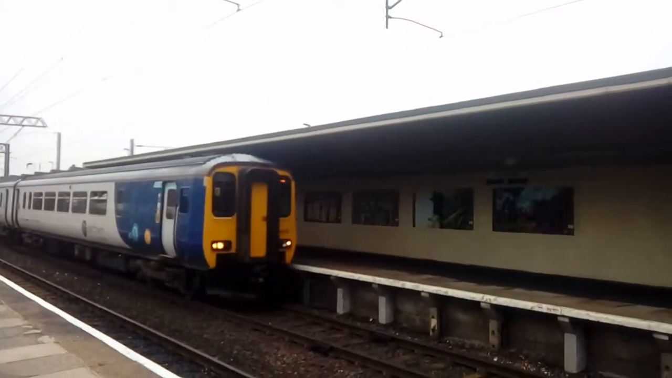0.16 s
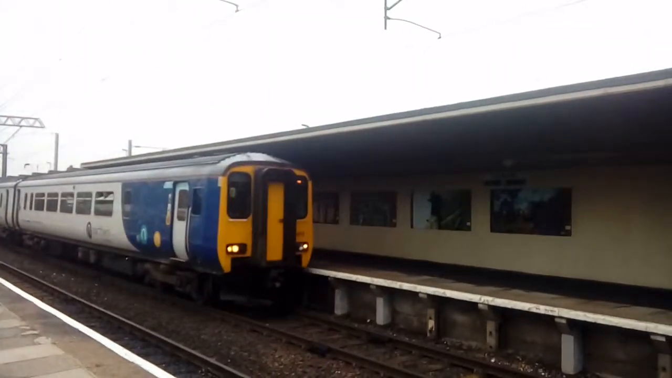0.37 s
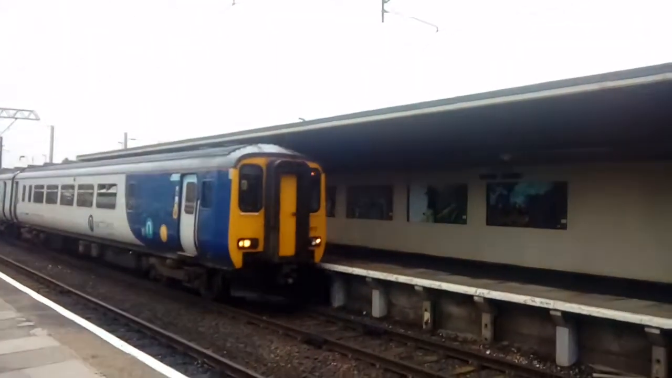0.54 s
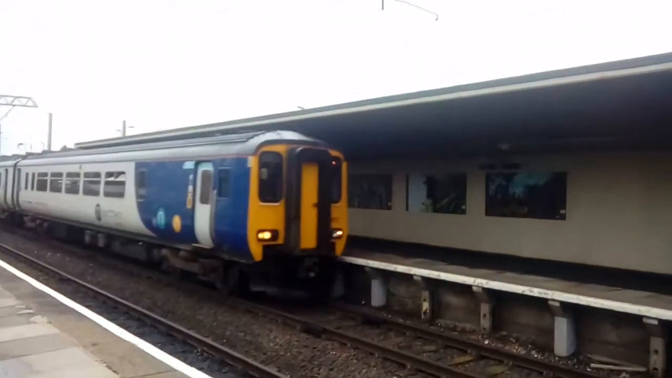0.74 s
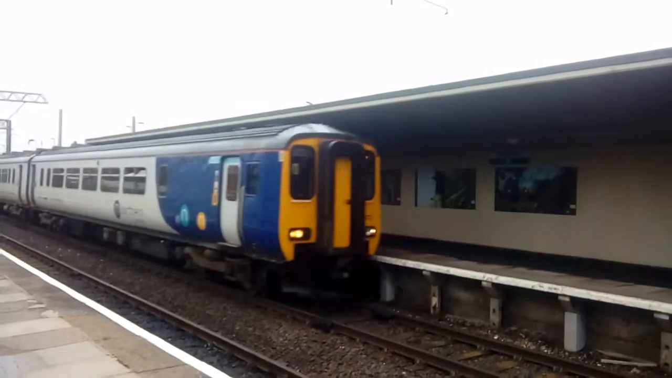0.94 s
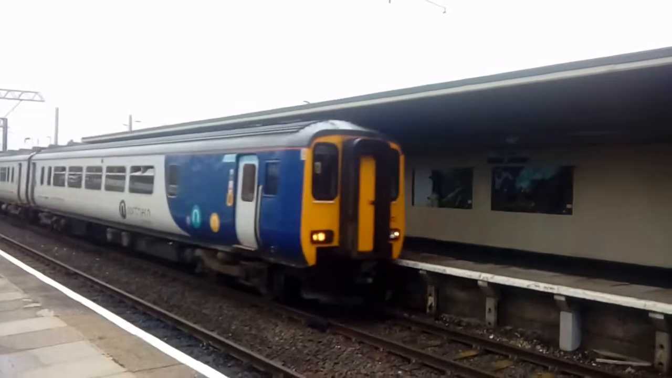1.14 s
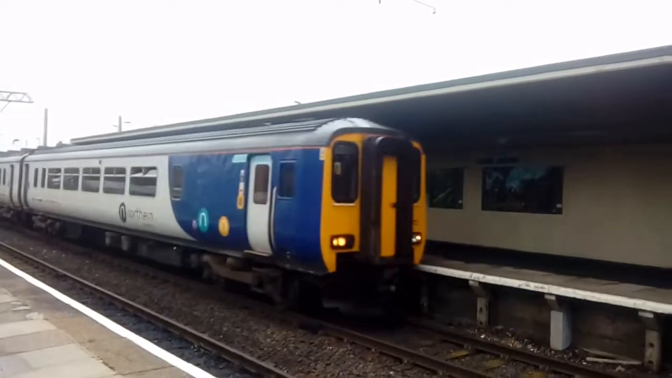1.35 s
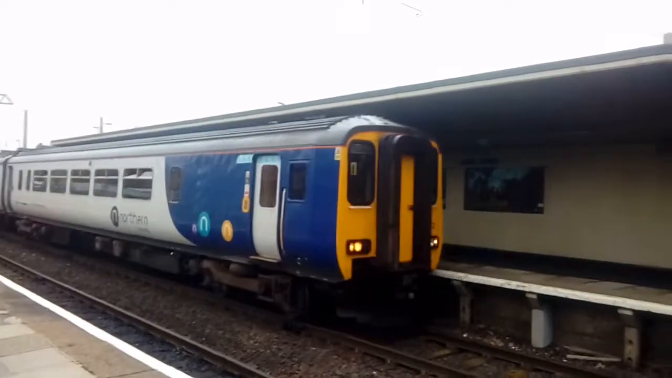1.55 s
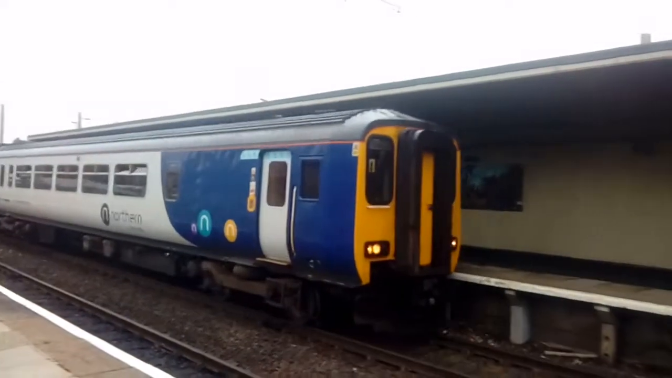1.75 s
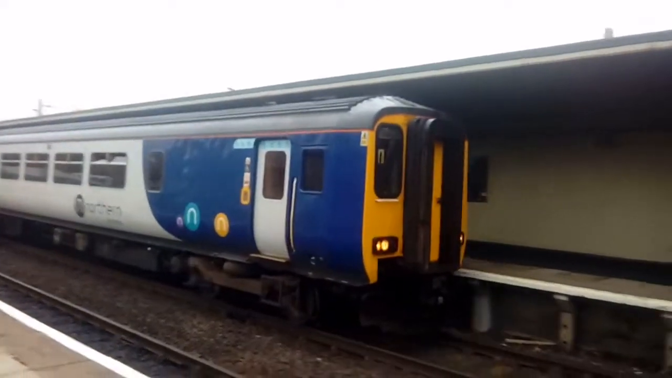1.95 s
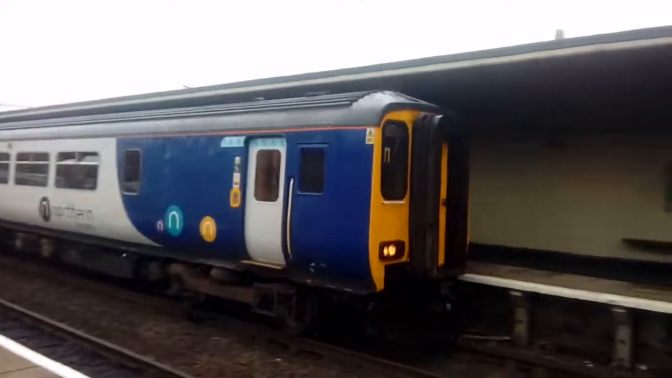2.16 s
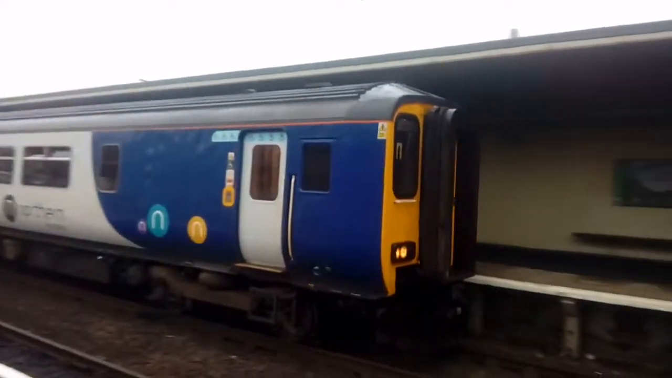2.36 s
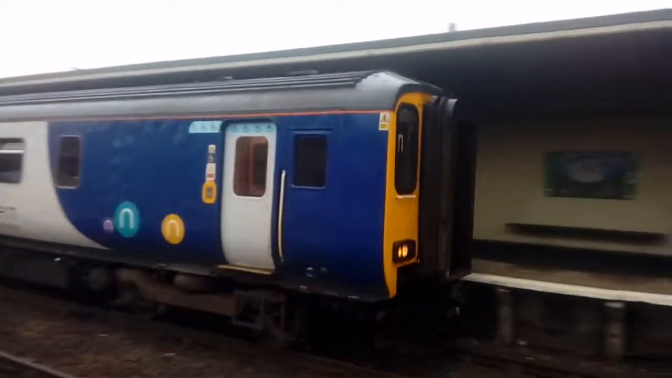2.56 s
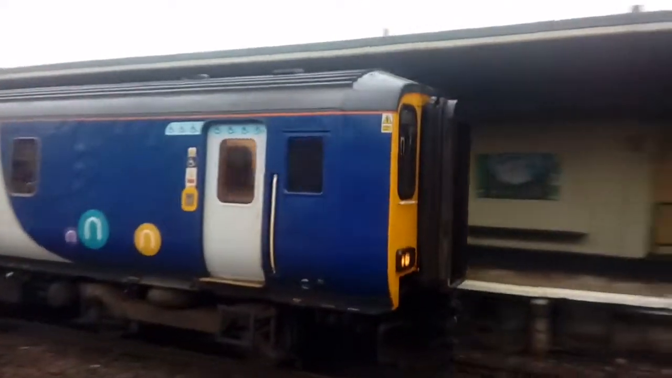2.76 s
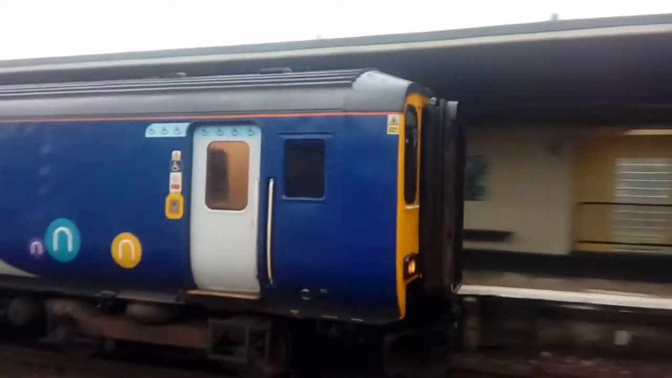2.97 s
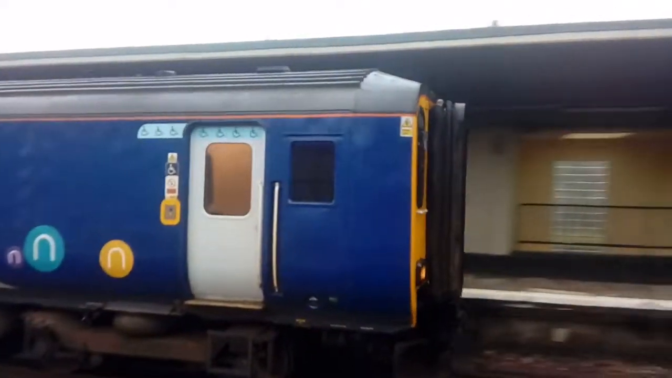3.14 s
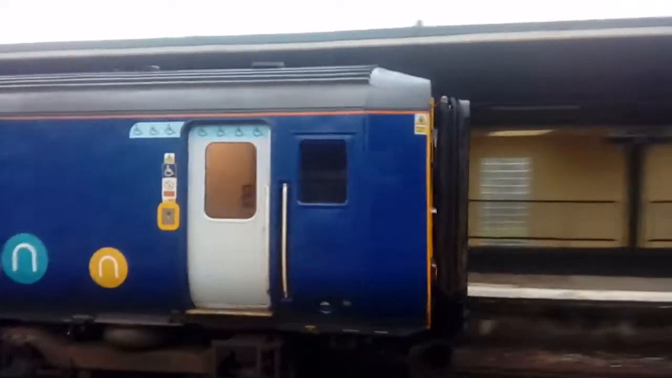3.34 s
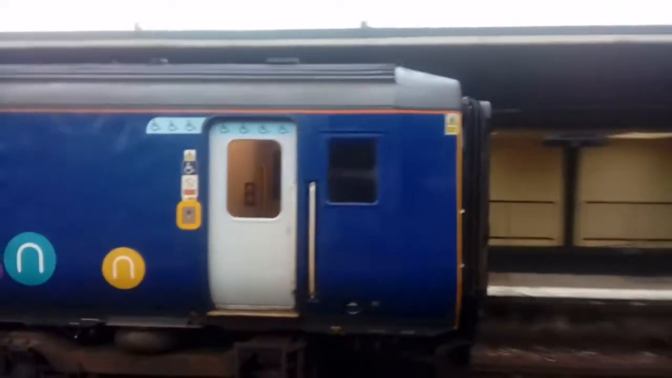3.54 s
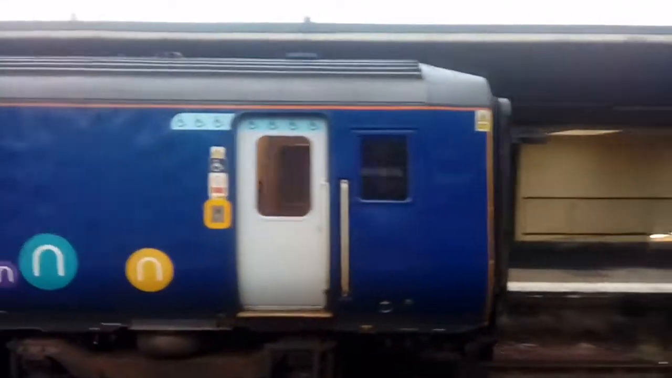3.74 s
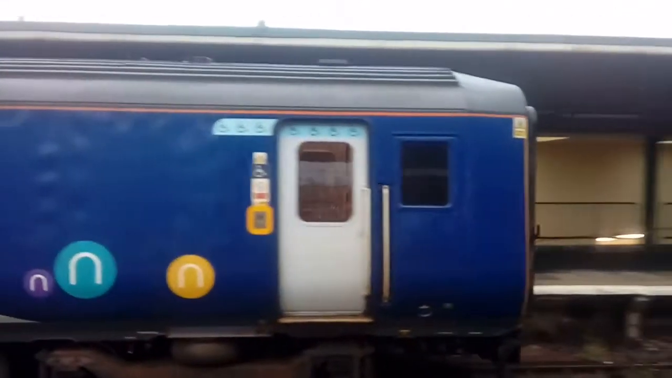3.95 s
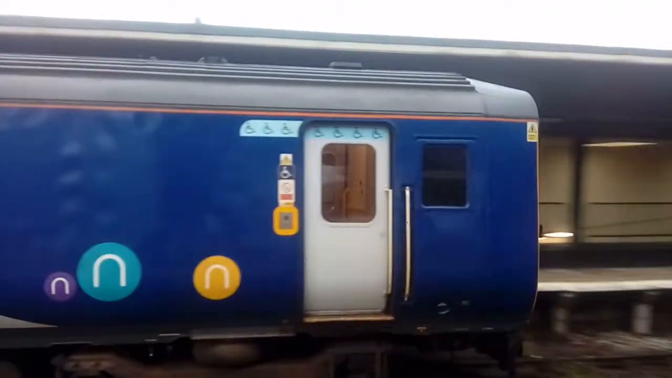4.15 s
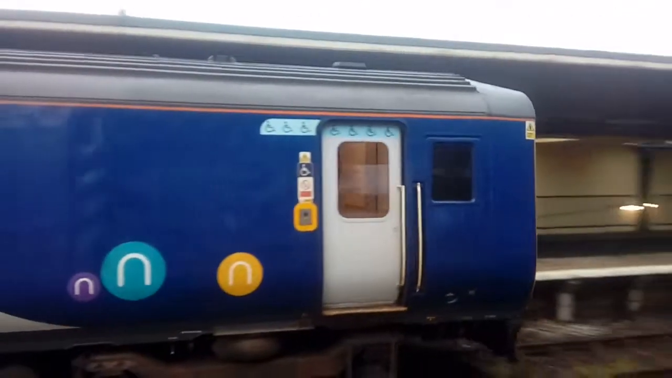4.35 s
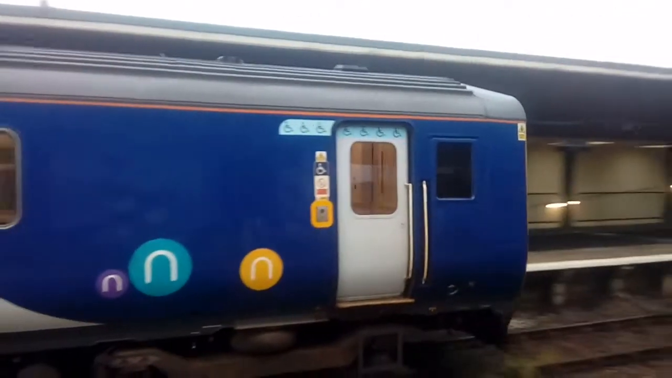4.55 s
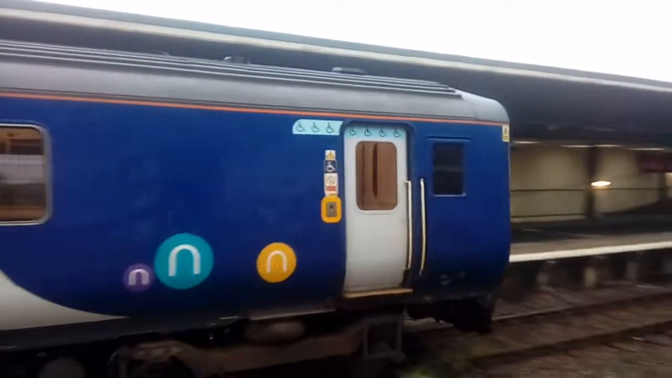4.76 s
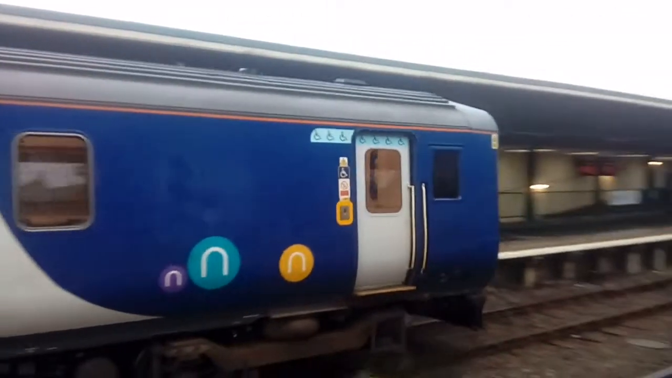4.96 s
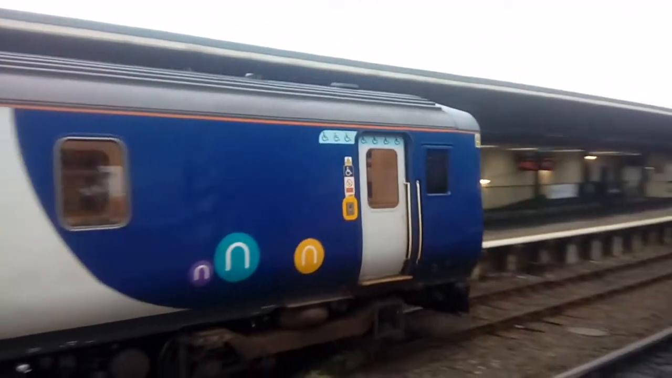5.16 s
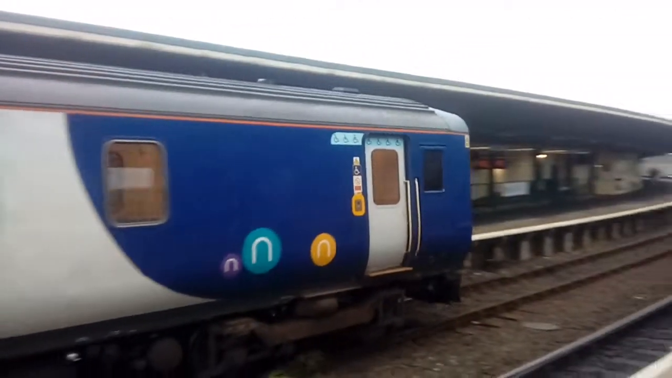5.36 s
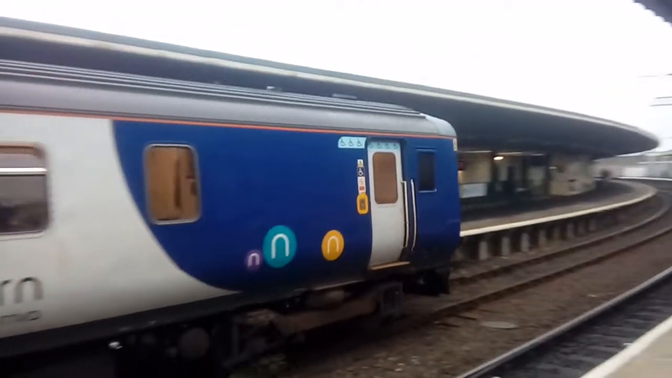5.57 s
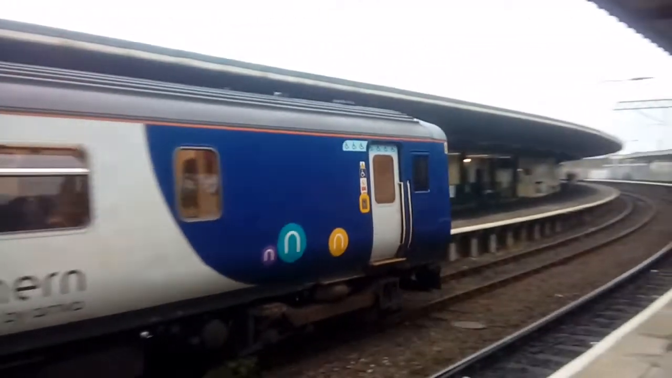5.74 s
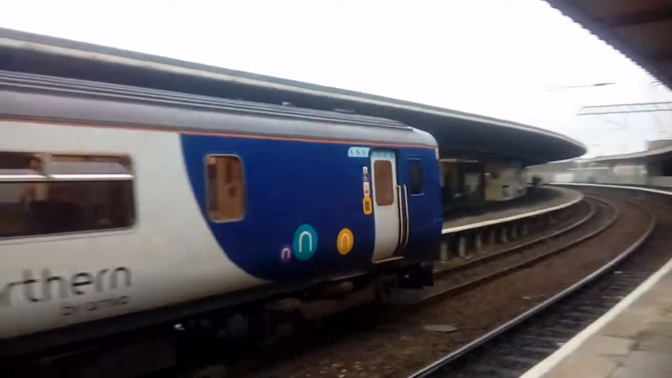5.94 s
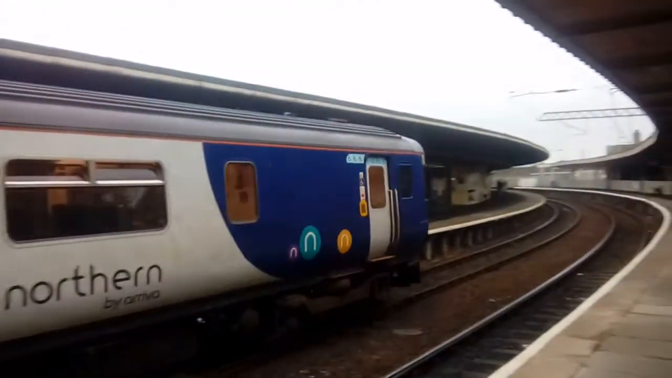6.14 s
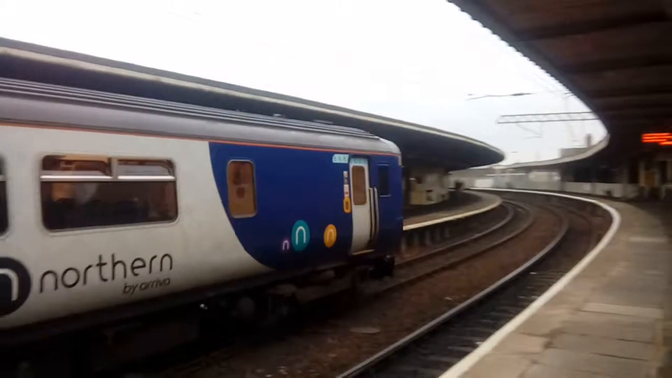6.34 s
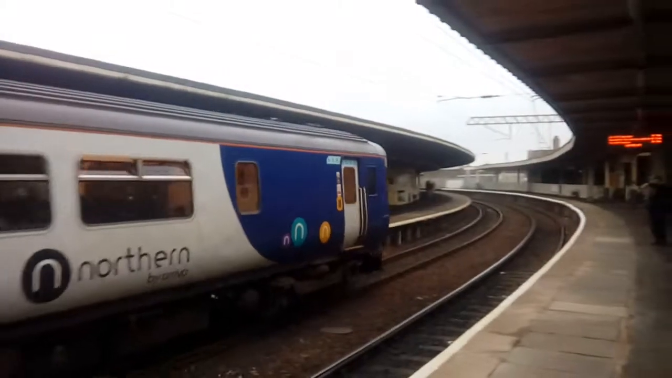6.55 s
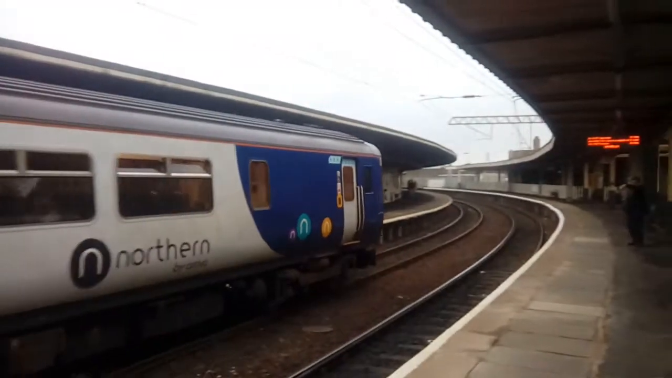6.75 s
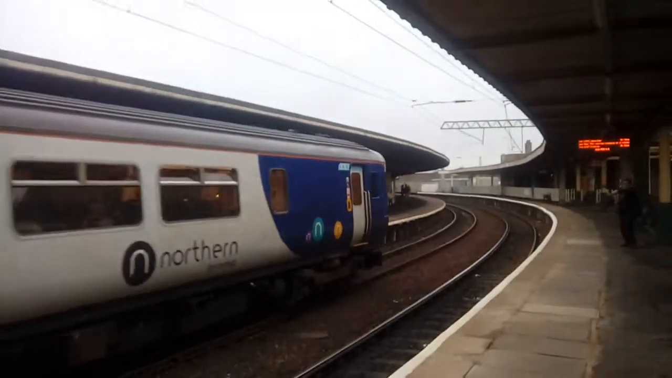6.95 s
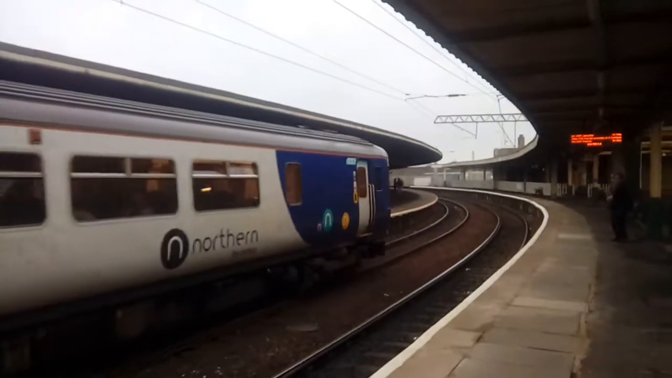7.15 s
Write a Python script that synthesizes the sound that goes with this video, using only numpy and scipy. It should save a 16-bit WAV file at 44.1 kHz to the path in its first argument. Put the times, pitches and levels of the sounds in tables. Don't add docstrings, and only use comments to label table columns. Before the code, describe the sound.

Growing wheel rumble and knocking idle engine of a passing diesel railcar, rail-joint clanks, a brief brake chirp, then a short air hiss.

```python
import sys
import numpy as np
from scipy import signal
from scipy.fft import rfft, irfft, next_fast_len
from scipy.io import wavfile
from scipy.ndimage import uniform_filter1d, map_coordinates

SR = 44100
rng = np.random.default_rng(int(sys.argv[2]) if len(sys.argv) > 2 else 0)


def store_pcm(level_fs):
    pcm = np.round(np.clip(level_fs, -1, 1) * 32767).astype(np.int16)
    wavfile.write(sys.argv[1], SR, np.atleast_2d(pcm).T)


def boost(x):
    u = np.asarray(x, float) / 20
    return 10 ** u


N = 317520
CYCLE_HZ = 6.17

# (time [s], gain over the farthest point [dB])
ENGINE_NEAR = [(0, 1.5), (.6, -0.5), (1.2, 1.5), (1.6, 1.5), (2.2, 2), (2.75, 3), (3.1, 3.5), (3.5, 5),
               (4.0, 6), (4.45, 7), (4.8, 8.5), (5.1, 9.5), (5.4, 11), (5.7, 11), (6.15, 13.5), (6.5, 13),
               (6.8, 15.5), (7.2, 15)]
# (time [s], gain [dB])
BOGIE_NEAR = [(0, -1), (.25, 2), (.64, -1), (1.0, 2), (1.42, 4.5), (1.7, 2.5), (2.04, 4.5), (2.25, 2.5),
              (2.6, 5), (3.3, 4.5), (4.1, 3), (4.7, 8.5), (5.05, 8), (5.42, 11), (5.65, 7), (6.0, 9.5),
              (6.5, 9), (7.2, 12)]
FIRINGS = [0.94, 0.92, 0.16, 0.98, 0.33, 0.5]


def unit(x):
    return x / np.sqrt(np.mean(x ** 2) + 1e-20)


def along(points, hz):
    f, v = np.transpose(points)
    return np.interp(np.log(hz + 1), np.log(f + 1), v)


def curves(rows):
    s, *cols = np.transpose(rows)
    return [np.interp(np.arange(N) / SR, s, c) for c in cols]


def nearer(level, near_db):
    far_db, slope = level
    return far_db + slope * near_db


def swells(rows, under_db=-90):
    t = np.arange(0, N + 64, 64) / SR
    power = sum(boost(2 * db) * np.exp(-((t - s) / half) ** 2) for s, db, half in rows)
    return 10 * np.log10(np.interp(np.arange(N) / SR, t, power) + boost(2 * under_db))


def wobble(rate):
    t = np.arange(0, N + 64, 64)
    knots = rng.standard_normal(int(N * rate / SR) + 4)
    return np.interp(np.arange(N), t, map_coordinates(knots, [t * rate / SR]))


def filtered(x, response):
    m = next_fast_len(len(x) + SR // 4)
    return irfft(rfft(x, m) * response(np.fft.rfftfreq(m, 1 / SR)), m)[:len(x)]


def shape(spectrum):
    return lambda hz: boost(along([(0.96, -120)] + spectrum + [(SR / 2, -120)], hz))


def mode(centre_hz, width_hz):
    return lambda f: 1j * f * width_hz / (centre_hz ** 2 - f * f + 1j * f * width_hz)


def patches(depth_db):
    z = signal.stft(rng.standard_normal(N), nperseg=512)[2]
    field = uniform_filter1d(rng.standard_normal(z.shape), size=6, axis=0)
    field = uniform_filter1d(field, size=12, axis=1)
    return signal.istft(z * boost(depth_db * unit(field)), nperseg=512)[1][:N]


def noise(response, patchy_db=None):
    if patchy_db is not None:
        return unit(filtered(patches(patchy_db), response))
    m = next_fast_len(N)
    re, im = rng.standard_normal((2, m // 2 + 1))
    return unit(irfft((re + 1j * im) * response(np.fft.rfftfreq(m, 1 / SR)), m)[:N])


def singing(centre_hz, width_hz, loose=1, rise_hz=0):
    hz = centre_hz + rise_hz + .2 * width_hz * loose ** 2 * wobble(25)
    note = np.sqrt(2) * np.sin(2 * np.pi * np.cumsum(hz) / SR) * boost(wobble(15))
    return unit(note + 0.43 * loose * noise(mode(centre_hz, 2 * width_hz)))


def beats(pattern_db, start, depth_db, scatter_db):
    turns = len(pattern_db) * (CYCLE_HZ * np.arange(N) / SR + start)
    blow = turns.astype(int)
    scatter = scatter_db * rng.standard_normal(blow[-1] + 1)
    size_db = np.array(pattern_db)[blow % len(pattern_db)] + scatter[blow]
    return unit(uniform_filter1d(boost(size_db - depth_db * (turns - blow)), size=450))


def canopy(x):
    # (frequency [Hz], t60 [s])
    decay = [(60, 0.69), (800, 0.84), (4000, .4), (10000, 0.091)]
    hz, t, z = signal.stft(rng.standard_normal(SR // 2), SR, nperseg=256)
    tail = signal.istft(z * boost(-60 * t / along(decay, hz)[:, None]), SR, nperseg=256)[1]
    return signal.fftconvolve(np.pad(x, (700, 0)), tail / np.linalg.norm(tail))[:N]


def rumble():
    # (frequency [Hz], density [dB per Hz])
    ground_spectrum = [(15, -24), (30, -19), (42, -5.5), (62, -3), (85, -3), (130, -9.5), (250, -26.5)]
    boom_spectrum = [(70, -38), (100, -8.5), (120, -1), (140, -10), (160, -6.5), (200, -6.5), (300, -24)]
    drone_spectrum = [(170, -12), (250, -2), (330, -2), (430, -0.5), (520, -15.5), (700, -29.5)]
    # (time [s], ground level [dB], frame drone level [dB], half length [s])
    lurches = [(.36, -56, -57, 0.13), (0.862, -60, -54, 0.054), (1.46, -45, -53, .08),
               (1.82, -51, -48, 0.12), (2.4, -50, -49.5, 0.18), (3.43, -58, -45, 0.22),
               (4.0, -56, -45.5, 0.27), (4.47, -50, -43, 0.13), (4.663, -55.5, -41, 0.066),
               (4.98, -57, -43.5, 0.087), (5.13, -49, -47, .1), (5.304, -54, -36, 0.066),
               (5.418, -49, -38, 0.066), (5.802, -59, -40, 0.12), (5.956, -41, -37.5, 0.066),
               (6.25, -44, -53.5, 0.18), (6.96, -50, -54, 0.16)]
    near_db, = curves(ENGINE_NEAR)
    bogie_db, = curves(BOGIE_NEAR)
    ground_db = swells([(s, db, half) for s, db, _, half in lurches], nearer((-53.5, 0.32), near_db))
    drone_db = swells([(s, db, half) for s, _, db, half in lurches], nearer((-53, 1.28), bogie_db))
    boom_db = swells([(4.83, -42, 0.41)], nearer((-58, 0.34), near_db))
    ground = boost(ground_db + 1.7 * wobble(9)) * noise(shape(ground_spectrum))
    boom = boost(boom_db + 3.5 + 0.7 * wobble(12)) * noise(shape(boom_spectrum))
    drone = boost(drone_db + 1.2 * wobble(10)) * noise(shape(drone_spectrum))
    return ground + boom + drone


def jolts():
    # (time [s], peak level [dB], push length [s])
    pushes = [
        (4.659, -40, 0.0028),
        (5.289, -29, 0.001),
        (5.4, -31, 0.0008),
        (5.925, -21, 0.0012),
        (5.934, -28, 0.00093),
        (7.042, -32, .002),
    ]
    out = np.zeros(N + SR)
    for s, db, length_s in pushes:
        u = np.arange(SR // 10) / SR / length_s
        out[round(s * SR):][:len(u)] += boost(db) * np.e * u * (2 - u) * np.exp(-u)
    return out[:N]


def rigging():
    # (time [s], peak level [dB], frequency [Hz])
    ticks = [(2.7386, -28, 1760), (2.8194, -23, 1640), (2.9138, -26, 1650), (3.4017, -25, 1650),
             (3.5618, -25, 1370), (3.6691, -24, 1820), (3.7564, -25, 1740), (3.9095, -25, 1790),
             (4.4538, -21, 1750), (4.5974, -25, 1990), (4.8768, -22, 1500), (5.0434, -19, 1700),
             (6.5001, -15, 2250), (6.5555, -14, 1530), (6.992, -13, 1400), (7.0688, -17, 2190)]
    flecks_per_s, fleck_hz, fleck_octaves, fleck_cycles = 70, 2600, .75, 45
    tick_t60_s, tick_gain_db = .03, -5
    near_db, = curves(ENGINE_NEAR)
    draw, pick = rng.random((500, 2)), rng.standard_normal(500)
    start_s = np.clip(np.cumsum(-np.log(draw[:, 0])) / flecks_per_s, 0, N / SR - .01)
    hz = np.clip(fleck_hz * 2 ** (fleck_octaves * pick), 1100, 9000)
    size_db = nearer((-47, 1.0), near_db[(start_s * SR).astype(int)])
    size_db = size_db - 2.7 * np.log(draw[:, 1]) - 2.4 * np.log2(hz / fleck_hz)
    tick_s, tick_db, tick_hz = np.transpose(ticks)
    t60_s = np.r_[3 * fleck_cycles / hz, np.full(len(tick_s), tick_t60_s)][:, None]
    keep = np.r_[start_s < N / SR - .02, np.ones(len(tick_s))][:, None]
    start_s = np.r_[start_s, tick_s]
    hz = np.r_[hz, tick_hz][:, None]
    size_db = np.r_[size_db, tick_db + tick_gain_db][:, None]
    k = np.arange(SR // 24)
    t = k / SR
    envelope = boost(size_db - 60 * t / t60_s) * (1 - np.exp(-t / (.06 * t60_s)))
    rings = keep * envelope * np.sin(2 * np.pi * hz * t)
    where = (start_s * SR).astype(int)[:, None] + k
    return np.bincount(where.ravel(), rings.ravel(), N + SR)[:N]


def plate():
    # (time [s], peak level [dB], frequency [Hz], t60 [s])
    plate_rings = [
        (1.648, -37.5, 3590, 0.23),
        (1.668, -56, 9700, .2),
        (2.255, -45, 2300, .25),
    ]
    out, t = np.zeros(N), np.arange(SR // 4) / SR
    for s, db, hz, t60_s in plate_rings:
        ring = unit(filtered(rng.standard_normal(len(t)), mode(hz, 40.0))) + np.sin(2 * np.pi * hz * t)
        out[round(s * SR):][:len(t)] += boost(db - 60 * t / t60_s) * (1 - np.exp(-t / 0.0063)) * ring
    return out


def clangs():
    # (time [s], peak level [dB], frequency [Hz], t60 [s])
    notes_struck = [(1.624, -21, 960, .07), (1.638, -23, 1150, .05), (1.666, -23, 800, .04),
                    (1.746, -27, 860, .04), (2.274, -22, 786, .07), (2.296, -26, 940, .05),
                    (2.325, -28, 616, .07), (5.285, -26, 430, .06), (5.288, -25.5, 300, .06),
                    (5.41, -22, 447, 0.088), (5.918, -28, 110, .12), (5.97, -36, 80, .15)]
    out, t = np.zeros(N + SR), np.arange(SR // 8) / SR
    for s, db, hz, t60_s in notes_struck:
        envelope = boost(db - 60 * t / t60_s) * (1 - np.exp(-t / 0.0018))
        out[round(s * SR):][:len(t)] += envelope * np.sin(2 * np.pi * hz * t)
    return out[:N]


def brakes():
    # (time [s], peak level [dB], half length [s])
    chirps = [
        (4.68, -38, 0.086),
        (4.78, -35.5, .06),
    ]
    # (frequency [Hz], width [Hz], level [dB])
    shoe_modes = [(6430, 450, -5), (9600, 1100, -2.5)]
    # (time [s], peak level [dB], half length [s])
    whistles = [
        (5.78, -52, .06),
        (6.47, -51.5, .1),
        (6.83, -44.5, .12),
        (7.03, -46, .06),
    ]
    # (time [s], peak level [dB], half length [s])
    bearing_swells = [
        (6.55, -45, .1),
        (6.75, -43, .08),
        (6.92, -42, .08),
    ]
    # (frequency [Hz], density [dB per Hz])
    jet_spectrum = [(800, -26), (1600, 9), (2400, -2), (4000, -5), (6500, -5.5), (9000, -11), (13000, -4.5)]
    air_s, air_rise_s, leak_db, burst_db, burst_s = 6.5, .02, -40, -30, 0.16
    shoe = sum(boost(db + 1.9 * wobble(34)) * noise(lambda f: mode(hz, w)(f) ** 2) for hz, w, db in shoe_modes)
    disc = boost(swells(whistles)) * singing(3200, 17)
    bearing = boost(swells(bearing_swells)) * singing(2900, 30)
    since_s = np.clip(np.arange(N) / SR - air_s, 0, None)
    flow = boost(leak_db) + boost(burst_db) * np.exp(-(since_s / burst_s) ** 2)
    vent = (1 - np.exp(-since_s / air_rise_s)) * flow
    air = vent * boost(wobble(14)) * noise(shape(jet_spectrum))
    return disc + bearing + boost(swells(chirps)) * shoe + air


def joint():
    # (time [s], peak level [dB], thump [dB], rattle [dB], rise [s])
    wheel_blows = [(0, -29.5, -17, -4, 0.0022), (1.619, -19, -16, -9, 0.014),
                   (1.655, -31.5, -3, -8, 0.0071), (2.245, -18, -15, -12.5, 0.0044),
                   (2.29, -29.5, -13, -5, 0.0042), (2.81, -35.5, -11, 3, 0.012),
                   (2.912, -33, -15, 0, 0.012), (3.385, -28, -10, -12, 0.006), (3.432, -37.5, -14, 3, .006),
                   (3.965, -27.5, -8.5, -10, .006), (4.66, -26.5, -17, -6, 0.0073),
                   (5.28, -36, -14, -18, .006), (5.34, -27, -20, -15, .006),
                   (5.405, -20.5, -14, -12, 0.0046), (5.915, -38, 2, -14, .01),
                   (6.005, -22, -11.5, -19, 0.0055), (6.31, -34, -9, -14, .006),
                   (6.44, -27, -24.5, -12, 0.0083), (7.035, -28, -19, -23, .004)]
    # (frequency [Hz], density [dB per Hz])
    bang_spectrum = [(200, -21.5), (400, -9.5), (600, -1), (850, -4), (1200, -9), (1600, -18),
                     (2500, -15.5)]
    thump_spectrum = [(35, -29.5), (55, -5), (90, 2.5), (160, 2.5), (300, -4.5), (450, -19)]
    rattle_spectrum = [(1200, -7), (2200, -1), (3600, 5.5), (5000, 3.5), (7000, 3), (8600, 6),
                       (10000, -2.5), (13000, -11)]
    # (frequency [Hz], level [dB], t60 [s])
    wheel_modes = [(609, 3, 0.12), (811, 1, 0.21), (880, -14, 0.2), (1000, -13, 0.24), (1230, -1, 0.14)]
    t60_s, sleeper_hz, evenness = .28, 60.5, .6
    spectra = (bang_spectrum, thump_spectrum, rattle_spectrum)
    out, t = np.zeros(N + SR), np.arange(SR // 4) / SR
    for s, db, thump_db, rattle_db, rise_s in wheel_blows:
        bang, ballast, rattle = (unit(filtered(rng.standard_normal(len(t)), shape(k))) for k in spectra)
        ring = sum(boost(level_db + rng.normal(0, 1.4) - 60 * t / life_s)
                   * np.sin(2 * np.pi * (hz * t + rng.random())) for hz, level_db, life_s in wheel_modes)
        thump = np.sin(2 * np.pi * sleeper_hz * t) * boost(-60 * t / (1.3 * t60_s))
        thump = thump + 0.7 * ballast * boost(-60 * t / t60_s)
        flutter = unit(uniform_filter1d(rng.standard_normal(len(t)), size=500))
        loose = rattle * boost(-60 * t / (1.34 * t60_s) + 2.3 * flutter)
        bang = bang / (uniform_filter1d(bang ** 2, size=220) + .05) ** (evenness / 2)
        body = bang * boost(-60 * t / t60_s) + boost(-6.5) * ring + boost(thump_db) * thump + boost(rattle_db) * loose
        out[round(s * SR):][:len(t)] += boost(db - 1.5) * (1 - np.exp(-t / rise_s)) ** 0.74 * body
    return out[:N]


def engine():
    tappets = [0.86, -1.1, 1.3, -0.93]
    # (frequency [Hz], density [dB per Hz])
    block_spectrum = [(700, -33), (1200, -3.5), (1700, -0.5), (2300, -1.5), (2650, -5.5), (3500, -7.5),
                      (4500, -11.5), (7000, -30)]
    valve_spectrum = [(2000, -18), (3500, -2), (4400, -2), (4900, -2), (5600, 0.5), (6500, 0.5),
                      (7800, -4.5), (9000, -9.5)]
    treble_spectrum = [(6500, -27), (8000, 0), (9500, 0), (11000, -1), (13000, -7.5)]
    # (time [s], peak level [dB], half length [s])
    pump_swells = [(.06, -52, .06), (.25, -52, .08), (.54, -50.5, .07), (.89, -52, 0.055), (1.1, -55, .16),
                   (1.4, -53, .12), (2.85, -50, .06), (3.08, -50, .05), (3.46, -45, 0.033),
                   (4.02, -48, .03), (4.56, -45, .04)]
    # (frequency [Hz], width [Hz], level [dB])
    pump_notes = [(2990, 39.4, -2), (3120, 40, -4.5)]
    # (time [s], peak level [dB], half length [s])
    cover_blows = [
        (2.82, -48, .008),
        (3.19, -50, .015),
        (3.48, -52, 0.022),
        (6.43, -41, .012),
        (6.555, -36, .018),
        (6.605, -40, .018),
        (6.76, -47, .02),
        (7.05, -44, 0.014),
        (7.19, -41, 0.013),
    ]
    near_db, = curves(ENGINE_NEAR)
    knock_db = nearer((-42, 0.96), near_db)
    clatter_db = nearer((-45.5, 0.92), near_db)
    sump_db = nearer((-50, 0.76), near_db)
    treble_db = nearer((-65.5, 0.88), near_db) - 14.5 * boost(-near_db)
    near = np.clip((clatter_db + 48.0) / 14, 0, 1)
    firing = beats(FIRINGS, 0.87, depth_db=3.5, scatter_db=0.8) ** near
    closing = beats(tappets, 0.865, depth_db=6.5, scatter_db=0.3) ** near
    block = boost(knock_db + 0.65 * wobble(12)) * noise(shape(block_spectrum), patchy_db=0.3)
    injector = boost(-4.5 - 0.74 * near_db) * singing(3060, 90)
    sump = boost(sump_db - 3.0) * (noise(lambda f: mode(3045, 340)(f) ** 2) + injector)
    valves = noise(shape(valve_spectrum), patchy_db=1.0)
    valves = valves + boost(treble_db - clatter_db + 24.0) * noise(shape(treble_spectrum), patchy_db=1.5)
    cover = noise(lambda f: mode(5270, 240)(f) ** 2)
    clatter = valves * closing ** 0.44 + boost(-13.0) * cover * closing ** 2.2
    pump = boost(swells(pump_swells)) * sum(boost(db) * singing(hz, w) for hz, w, db in pump_notes)
    sway = boost(0.67 * wobble(5.03) + 0.33 * wobble(20))
    body = (block + sump) * firing + boost(clatter_db + 0.3 * wobble(9)) * clatter
    return pump + boost(swells(cover_blows)) * cover + sway * body


def rolling():
    # (time [s], gain [dB])
    axles_near = [(0, -2), (.7, 0), (1.1, 0.5), (1.45, -4), (1.7, 5), (2.05, -9), (2.21, 5.5), (2.5, 1.5),
                  (3.05, 2), (3.55, 6), (4.2, 9), (4.45, 9.5), (5.0, 8), (5.6, 12), (6.25, 14.5),
                  (6.48, 16.5), (6.75, 16.5), (7.2, 16.5)]
    # (frequency [Hz], density [dB per Hz])
    roar_spectrum = [(150, -45), (300, -29.5), (450, -4.5), (560, -1.5), (640, 0.5), (720, -3),
                     (1100, -4.5), (1350, -11.5), (2000, -34), (4000, -30.5)]
    axle_spectrum = [(550, -25), (720, -2), (820, 0), (950, -0.5), (1060, -8.5), (1300, -15.5)]
    # (time [s], peak level [dB], half length [s])
    ripples = [(.98, -38, .05), (1.39, -46, .03), (1.68, -34, .04), (2.4, -42.5, 0.21), (2.9, -41, 0.2),
               (3.26, -31, 0.037), (3.38, -25.5, 0.025), (3.57, -29, 0.049), (3.72, -29, 0.061),
               (3.95, -28.5, 0.087), (4.22, -31, 0.067), (4.36, -31, 0.039), (4.48, -36, 0.037),
               (4.6, -38, 0.17), (4.9, -30, 0.036), (5.03, -29, 0.027), (5.45, -32, 0.057),
               (5.61, -31, 0.05), (6.02, -29, 0.23), (6.3, -23.5, 0.14), (6.47, -20, 0.037),
               (7.1, -30, 0.23)]
    # (time [s], peak level [dB], half length [s])
    flange_brushes = [(0, -29.5, 0.032), (.12, -43, 0.046), (.48, -45, .1), (.81, -46.5, .04),
                      (1.06, -37, 0.05), (1.36, -39.5, 0.077), (1.62, -41, .08), (1.79, -41, .04),
                      (2.06, -38, 0.081), (2.27, -35, 0.057), (3.02, -40, 0.072), (3.32, -48, .1),
                      (3.73, -43, .04), (3.95, -38.5, .07), (4.48, -34.5, .06), (4.69, -34.5, 0.049),
                      (5.07, -36.5, 0.15), (5.35, -38, .1), (5.78, -32, 0.048), (6.0, -30, 0.1),
                      (6.47, -36, .05), (6.64, -33.5, 0.056), (7.0, -32, 0.078)]
    # (time [s], smear of its note [1-3], pitch rise [Hz])
    smear = [(0, 1.58, 0), (3.1, 1.05, 0), (4.05, 0.93, 0), (4.4, 1.26, 18), (4.8, 2.4, 34.5),
             (5.3, 2.1, 0.5), (6.05, 1.395, 0), (6.2, 1.2, -0.5), (6.4, 1.08, 0), (6.6, 2.2, -10),
             (6.9, 1.8, 11), (7.2, 1.6, 39.5)]
    # (time [s], peak level [dB], half length [s])
    after_rings = [
        (.75, -49, .15),
        (2.6, -46, 0.15),
        (3.05, -43, .1),
    ]
    # (time [s], peak level [dB], half length [s])
    inner_swells = [
        (3.95, -38, .06),
        (5.2, -36, .04),
        (5.44, -31, .04),
        (5.6, -35, 0.11),
        (6.3, -37, .06),
        (6.76, -31, 0.045),
    ]
    bogie_db, = curves(BOGIE_NEAR)
    driven_db, = curves(axles_near)
    loose, rise_hz = curves(smear)
    roar_db = nearer((-40, 0.96), bogie_db)
    axle_db = nearer((-39, 1.012), driven_db)
    rail_db = swells(ripples, nearer((-52.5, 0.4), driven_db) + 1.9 * wobble(8.1))
    wheel_db = swells(flange_brushes, nearer((-46.5, .6), bogie_db))
    shake_db = 0.6 * wobble(14) + 0.56 * wobble(30)
    roar = boost(roar_db + 1.5) * noise(shape(roar_spectrum), patchy_db=0.53)
    howl = boost(axle_db - 2.5) * noise(shape(axle_spectrum), patchy_db=0.76)
    throb = beats(FIRINGS, 0.863, depth_db=3.0, scatter_db=0.7) ** np.clip(driven_db / 9.0, 0, 1)
    rim = boost(swells(after_rings)) * singing(613, 30)
    inner_rail = boost(swells(inner_swells)) * singing(822, 20)
    wheel = boost(wheel_db - 2.5) * singing(553, 35.3, loose=1.25)
    rail = boost(rail_db - 4.0) * singing(889, 20.5, loose, rise_hz)
    return boost(shake_db) * (roar + howl) * throb + rim + inner_rail + wheel + rail


def scene():
    blows = joint() + plate() + jolts() + rigging() + clangs()
    steady = rolling() + rumble() + engine() + brakes()
    return (steady + blows + boost(-13.0) * canopy(blows))[None]


def low_pass(x):
    return signal.sosfilt(signal.butter(12, 15720, fs=SR, output="sos"), x)


def record(dry):
    # (frequency [Hz], gain [dB])
    mic_response = [(20, 3.5), (6620, 0), (6800, -4.5), (7500, -9), (8000, -19), (9900, -27), (12000, -40),
                    (14000, -59)]
    # (frequency [Hz], density [dB per Hz])
    hiss_spectrum = [(40, -14.5), (8000, -14), (13600, -11), (14400, -4.5), (14900, -2), (15700, -1)]
    ceiling, dip_hz, hiss_top_hz = .42, 213, 15720

    def dip(f):
        return (dip_hz ** 2 - f * f + 8j * f) / (dip_hz ** 2 - f * f + 160j * f)

    held = dry[0] / (1 + (dry[0] / ceiling) ** 4) ** .25
    heard = filtered(held, lambda f: dip(f) * boost(along(mic_response, f)))
    hiss = boost(-80) * noise(lambda f: boost(along(hiss_spectrum, f)) * (f < hiss_top_hz))
    return low_pass((heard + hiss)[None])


dry = scene()
out = record(dry)
store_pcm(out)
```